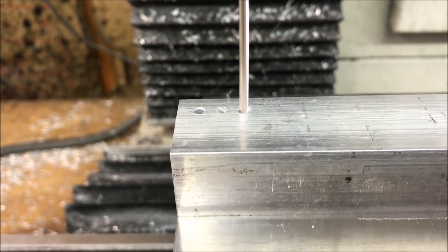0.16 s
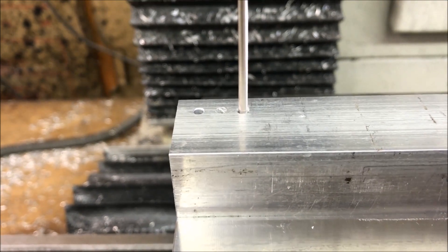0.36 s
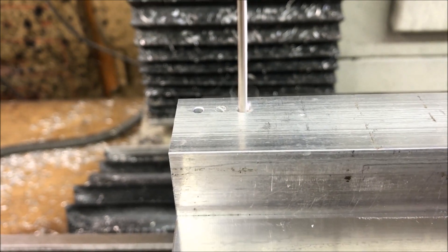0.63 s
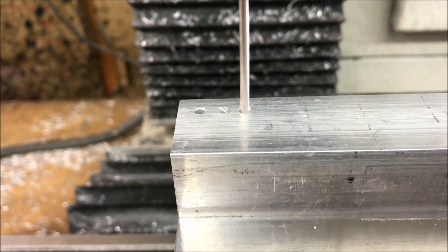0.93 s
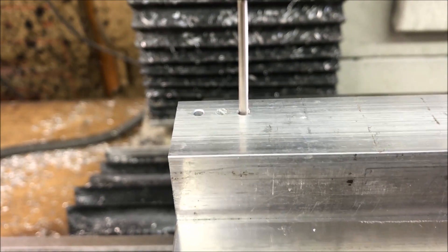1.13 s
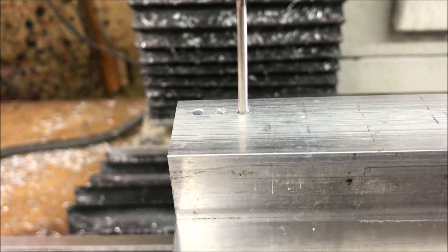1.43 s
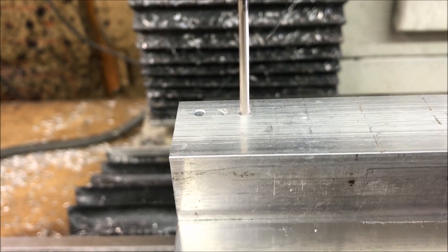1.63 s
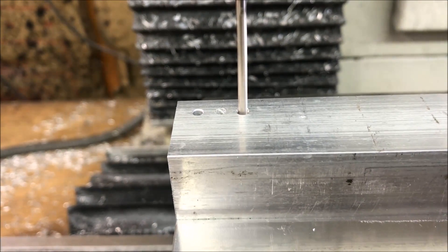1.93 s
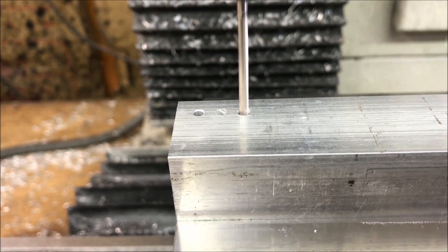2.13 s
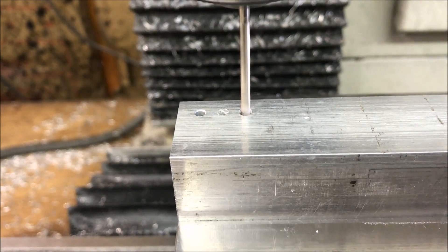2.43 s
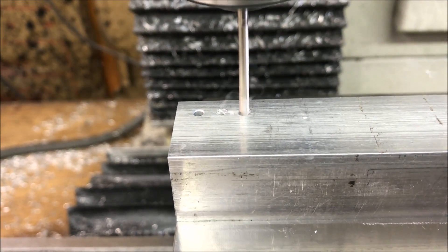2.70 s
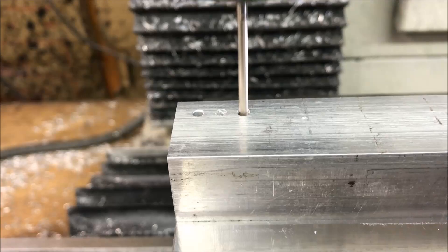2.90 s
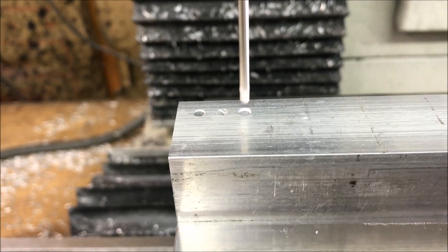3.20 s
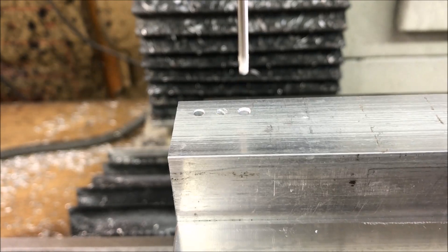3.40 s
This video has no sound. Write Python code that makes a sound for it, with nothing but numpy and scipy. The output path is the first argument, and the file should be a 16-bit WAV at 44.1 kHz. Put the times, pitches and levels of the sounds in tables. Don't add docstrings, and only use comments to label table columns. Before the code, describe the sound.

A high, breathy, fluttering whistle from air blown through a thin drill in an aluminium block, narrowing as the hole deepens, then dying as the drill lifts out; muffled workshop roar behind, close phone microphone.

```python
import sys
import numpy as np
from scipy import signal
from scipy.fft import rfft, irfft
from scipy.io import wavfile
from scipy.ndimage import uniform_filter1d, map_coordinates

SR = 44100
rng = np.random.default_rng(int(sys.argv[2]) if len(sys.argv) > 2 else 0)


def attenuation_scalar(level_db):
    decades = np.asarray(level_db, float) / 20
    return 10 ** decades


def persist_wave(psi):
    counts = np.round(np.clip(psi, -1, 1) * 32767).astype(np.int16)
    wavfile.write(sys.argv[1], SR, np.atleast_2d(counts).T)


N = 156555


def unit(x):
    return x / np.sqrt(np.mean(np.abs(x) ** 2) + 1e-20)


def curves(rows):
    start_s, *columns = np.transpose(rows)
    t = np.arange(N) / SR
    return [np.interp(t, start_s, column) for column in columns]


def wobble(rate_hz):
    knots = rng.standard_normal(int(N / SR * 200))
    return map_coordinates(knots, [np.arange(N) * rate_hz / SR])


def lobes(peaks):
    f = np.fft.fftfreq(N, 1 / SR)
    gain = sum(attenuation_scalar(db) / (1 + (2 * (f - offset_hz) / width_hz) ** 2) for offset_hz, width_hz, db in peaks)
    return unit(np.fft.ifft(gain * np.fft.fft(rng.standard_normal(N))))


# pitch_hz, width_hz, boost_db
ENCLOSURE_MODES = [(1130, 250, 4), (2050, 250, 2), (2760, 150, 4), (3620, 300, 4), (4550, 200, 2),
                   (7900, 200, 4), (10450, 300, -3), (11850, 250, 3), (13200, 300, 2.5), (13680, 300, 2.5),
                   (15250, 300, 2.5)]


def hiss(spectrum, patchy_db):
    hz, _, z = signal.stft(rng.standard_normal(N + SR // 10), SR, nperseg=2048)
    knot_hz, knot_db = np.transpose(spectrum)
    db = np.interp(np.log(hz + 1), np.log(knot_hz + 1), knot_db)
    for mode_hz, width_hz, boost_db in ENCLOSURE_MODES:
        db = db + boost_db / (1 + (2 * (hz - mode_hz) / width_hz) ** 2)
    patches = uniform_filter1d(rng.standard_normal(z.shape), size=15, axis=0)
    patches = unit(uniform_filter1d(patches, size=3, axis=1))
    _, noise = signal.istft(z * attenuation_scalar(db[:, None] + patchy_db * patches), SR, nperseg=2048)
    return unit(noise[:N])


# start_s, level_db, pitch_hz, upper_db (upper mode over whistle), depth (0-1)
WHISTLE_COURSE = [(0, -33, 6286, -10, 0.03), (.3, -29, 6333, -13, 0.27), (.8, -28.5, 6344, -15, 0.2),
                  (1.05, -27.5, 6360, -16, 0.25), (1.3, -27, 6370, -14, 0.33), (1.55, -26, 6357, -18, .5),
                  (2.1, -27, 6416, -16.5, 0.75), (2.35, -27.5, 6433, -16, 0.84),
                  (2.55, -29.5, 6510, -11.5, 0.8), (2.75, -30, 6500, -9, 0.94), (2.9, -28, 6520, -9, 0.73),
                  (2.99, -29, 6480, -7, 0.83), (3.05, -25, 6410, -19, 0.8), (3.12, -34.5, 6350, -15, .6),
                  (3.2, -43, 6390, -11, 0.1), (3.27, -41, 6440, -13.5, 0.4), (3.55, -51.5, 6460, 2.5, 0.55)]
# offset_hz, width_hz, level_db
SHALLOW_HOLE = [(-640, 450, -11.5), (-270, 220, -11), (-89, 310, -2), (90.5, 220, 3), (814, 140, -10)]
# offset_hz, width_hz, level_db
DEEP_HOLE = [(-650, 200, -35.5), (-130, 130, -1.5), (30, 98, 3), (600, 560, -56)]
# offset_hz, width_hz, level_db
UPPER_MODE = [(5, 350, -1.5), (-480, 360, -6), (670, 80, -14)]
# pitch_hz, density_db (per Hz)
FLUTE_DRAFT = [(1500, -29), (3500, -6), (5500, -6), (10000, 1.5), (13000, -4), (13900, -11), (16000, -4)]


def whistle():
    level_db, pitch_hz, upper_db, depth = curves(WHISTLE_COURSE)
    depth = np.clip(depth, 0, 1)
    flutter_db, surge_db = 1.03, 0.63
    gust_db = flutter_db * wobble(50) + surge_db * wobble(14)

    swing = np.sqrt(1 - depth) * lobes(SHALLOW_HOLE) + np.sqrt(depth) * lobes(DEEP_HOLE)
    swing = swing * attenuation_scalar(gust_db)
    saturates = 0.66
    swing = unit(swing / (1 + np.abs(swing / saturates) ** 2) ** .2)
    main = swing * np.exp(2j * np.pi * np.cumsum(pitch_hz) / SR)

    upper_hz, upper_trim_db, draft_db = 9356, -0.5, -4
    upper = lobes(UPPER_MODE) * np.exp(2j * np.pi * upper_hz * np.arange(N) / SR)
    upper = upper * attenuation_scalar(upper_trim_db + 0.8 * gust_db)
    upper = upper + attenuation_scalar(draft_db) * hiss(FLUTE_DRAFT, patchy_db=0.8)
    return np.sqrt(2) * attenuation_scalar(level_db) * (main + upper * attenuation_scalar(upper_db)).real


# shaft_order, level_db (over the workshop)
PUMP_ORDERS = [(2, -12), (3, -13), (4, -9), (5, -21.5), (6, -22.5), (7, -20.5), (8, -18), (9, -19.5),
               (10, -26.5), (11, -19), (12, -20)]


def hum():
    pump_hz, fan_hz, mains_hz = 28.4, 116.7, 240
    fan_db, fan_second_db, mains_db, sway_db = -12.5, -14.5, -19, 1.4
    t = np.arange(N) / SR - .153
    lines = [(order * pump_hz, db) for order, db in PUMP_ORDERS]
    lines += [(2 * fan_hz, fan_second_db), (mains_hz, mains_db)]
    tones = attenuation_scalar(fan_db) * np.cos(2 * np.pi * fan_hz * t)
    for hz, db in lines:
        phase = rng.uniform(0, 2 * np.pi)
        if round(hz) == round(4 * pump_hz):
            phase = 0
        tones = tones + attenuation_scalar(db + sway_db * wobble(6)) * np.cos(2 * np.pi * hz * t + phase)
    return tones


# start_s, level_db, spill_db (jet spill over it)
SHOP_COURSE = [(0, -35.5, 2), (.05, -35.5, -4), (.6, -37.5, -3), (1.3, -42, -2.5), (1.6, -45.5, -2.5),
               (2.1, -50.5, -4.5), (2.7, -52, -8), (2.98, -51.5, -6.5), (3.15, -49, -1.5), (3.3, -46.5, -3),
               (3.55, -44.5, 3.5)]
# pitch_hz, density_db
ROAR_SPECTRUM = [(25, -30), (55, -10.5), (300, -10), (464, -11.5), (1100, -4.5), (3100, -10), (7000, -8),
                 (11000, -16.5)]
# pitch_hz, density_db
SPILL_SPECTRUM = [(9000, -25.5), (11000, -5), (12800, 0.5), (13600, -2), (14400, -2.5), (15400, -1.5),
                  (16000, -6)]


def shop():
    level_db, spill_db = curves(SHOP_COURSE)
    roar = attenuation_scalar(4.5 + 0.19 * wobble(11)) * hiss(ROAR_SPECTRUM, patchy_db=0.88)
    spill = attenuation_scalar(2.5 + spill_db + 0.16 * wobble(14)) * hiss(SPILL_SPECTRUM, patchy_db=2.5)
    hum_gain = attenuation_scalar(0.08 * (level_db - level_db.max()))
    return attenuation_scalar(level_db) * (roar + spill + hum() * hum_gain)


# pitch_hz, width_hz, depth (0-1)
BLOCK_NOTCHES = [(5760, 90, 0.7), (7520, 125, 0.42), (8000, 98, 0.28)]


def scene():
    f = np.fft.rfftfreq(N, 1 / SR)
    gain = np.ones(len(f))
    for notch_hz, width_hz, depth in BLOCK_NOTCHES:
        gain = gain * (1 - np.clip(depth, 0, .9) / (1 + (2 * (f - notch_hz) / width_hz) ** 2))
    return irfft(rfft(whistle() + shop()) * gain, N)[None]


STARVED_FRAMES = [.0047, .154, .3033, .474, 1.5193, 1.9247, 2.0527, 2.1593, 2.586, 2.714, 2.970, 3.354,
                  3.418]


def starve(x):
    hop = 941
    step_db, leak_db = 15.5, -30
    n, k = np.arange(2 * hop), np.arange(hop)
    basis = np.cos(np.pi / hop * np.outer(k + .5, n + .5 + hop / 2)) * np.sqrt(2 / hop)
    basis = basis * np.sin(np.pi * (n + .5) / (2 * hop))
    out = np.pad(x, hop)
    at = np.round(np.array(STARVED_FRAMES) * SR).astype(int)[:, None] + n
    bins = out[at] @ basis.T
    around = np.pad(np.abs(bins), ((0, 0), (40, 40)), 'reflect')
    median = signal.medfilt2d(around, kernel_size=(1, 81))[:, 40:-40]
    step = median * attenuation_scalar(step_db) + 1e-12
    coarse = np.sign(bins) * np.floor(np.abs(bins) / step + .35) * step
    out[at] -= (1 - attenuation_scalar(leak_db)) * (bins - coarse) @ basis
    return out[hop:-hop]


def roll_off(x):
    return signal.sosfilt(signal.butter(12, 17020, fs=SR, output="sos"), x)


def record(dry):
    x = starve(dry[0])
    x = irfft(rfft(x) * (np.fft.rfftfreq(N, 1 / SR) < 15760), N)
    return roll_off(x[None])


dry = scene()
out = record(dry)
persist_wave(out)
```